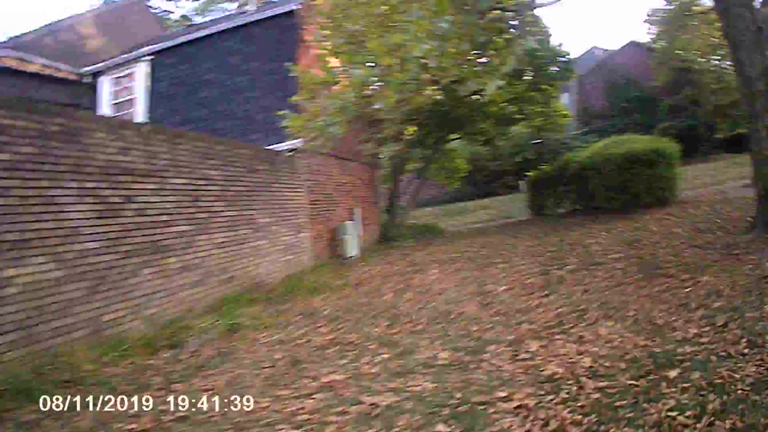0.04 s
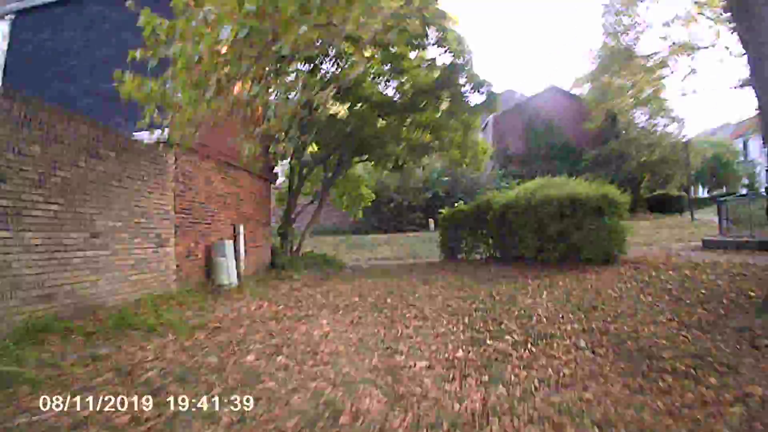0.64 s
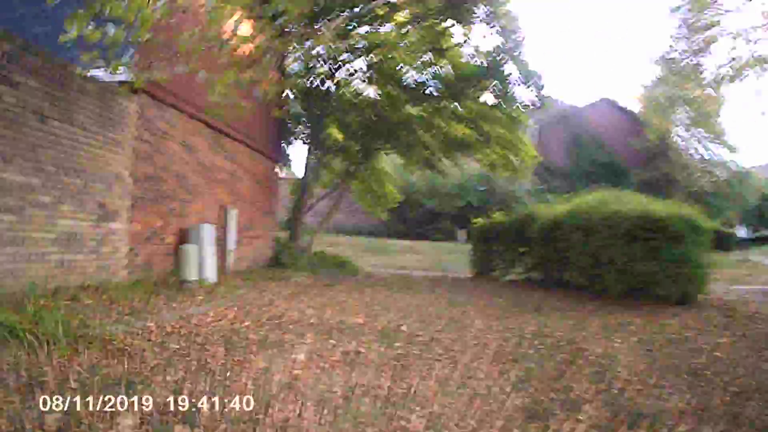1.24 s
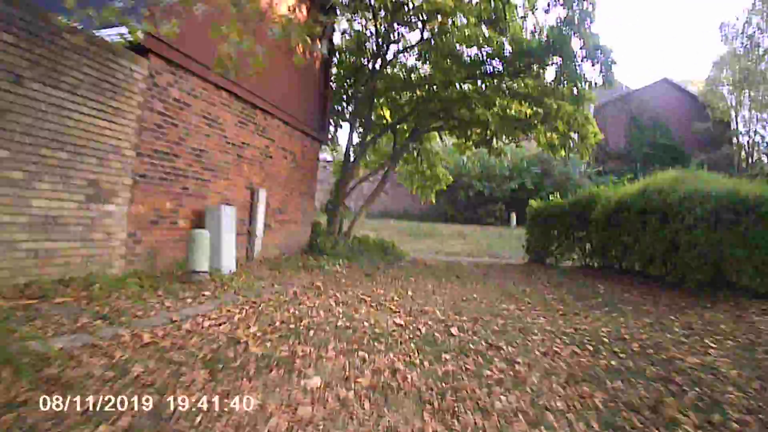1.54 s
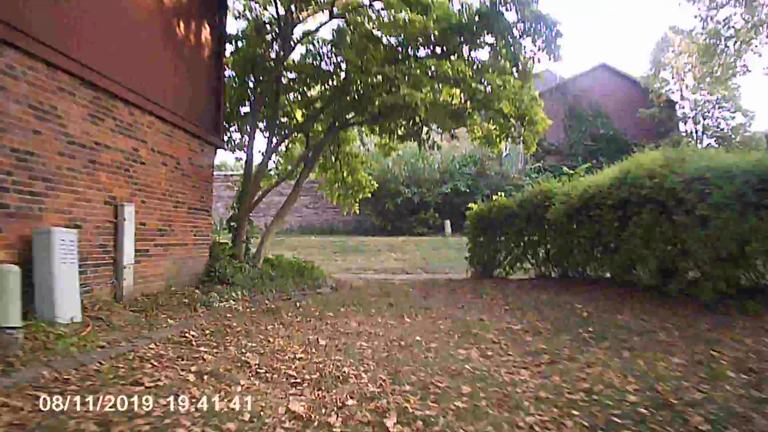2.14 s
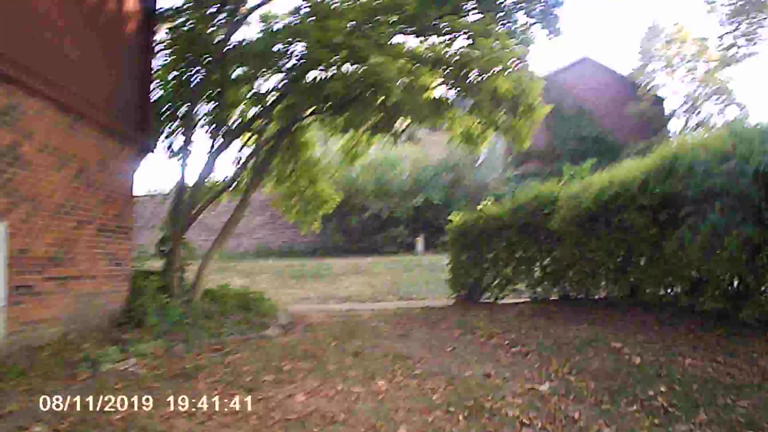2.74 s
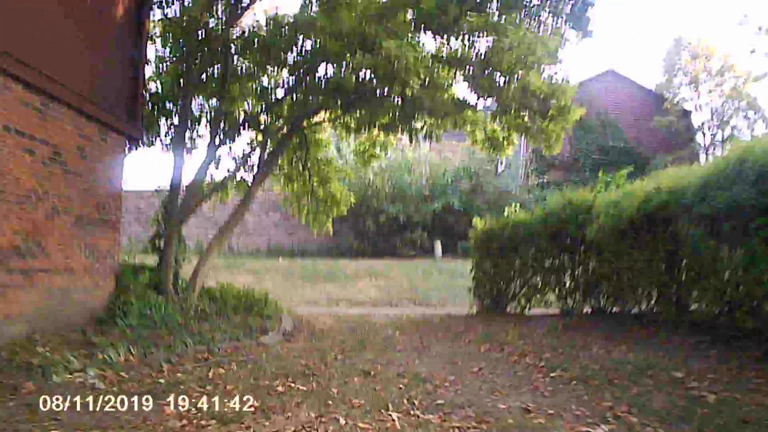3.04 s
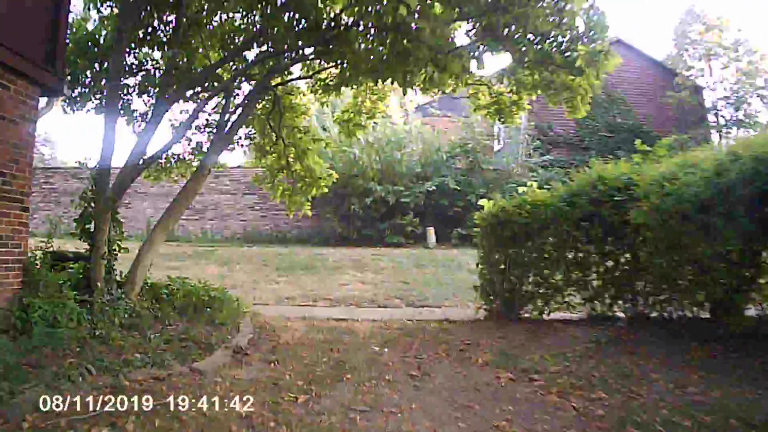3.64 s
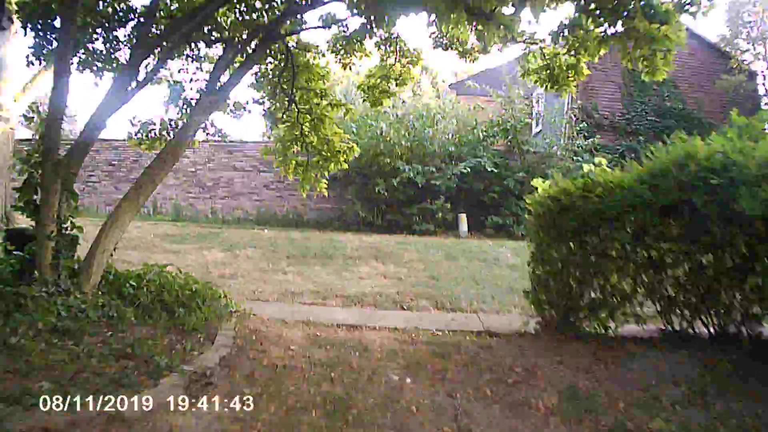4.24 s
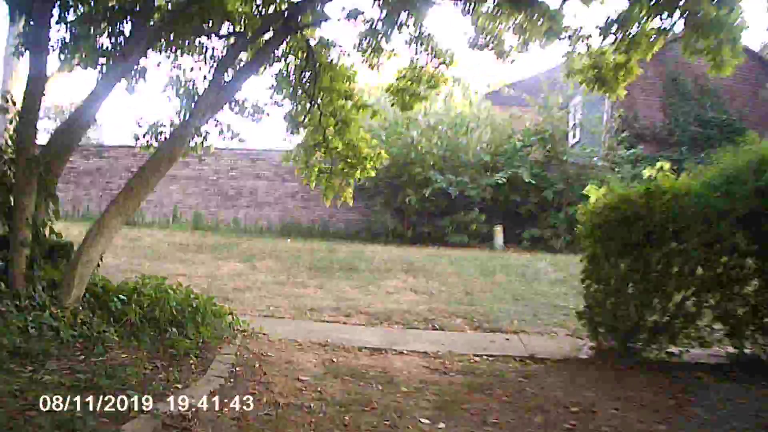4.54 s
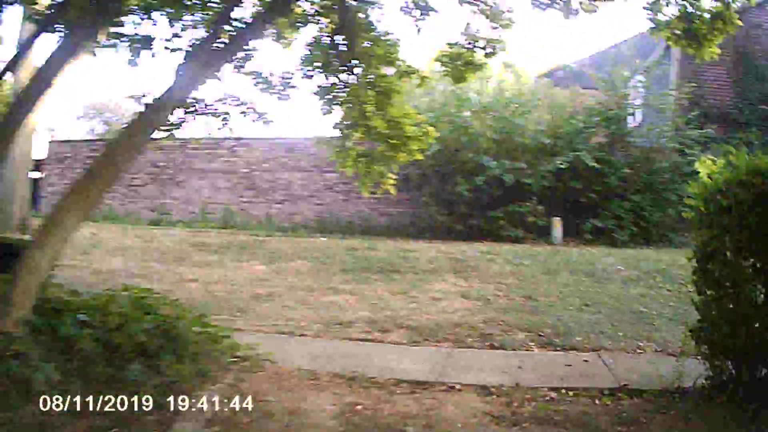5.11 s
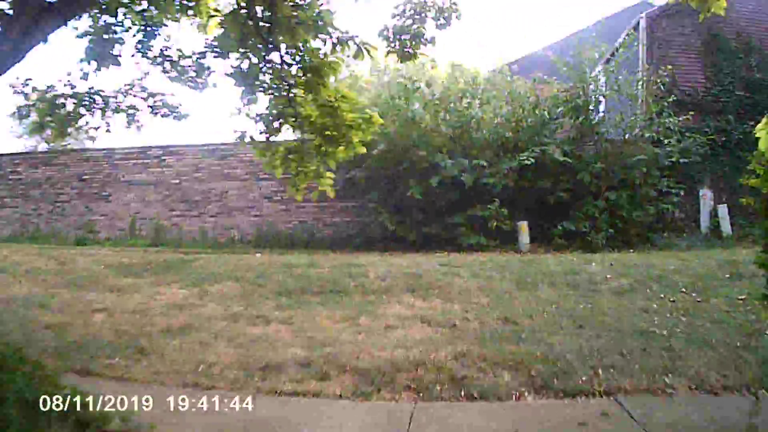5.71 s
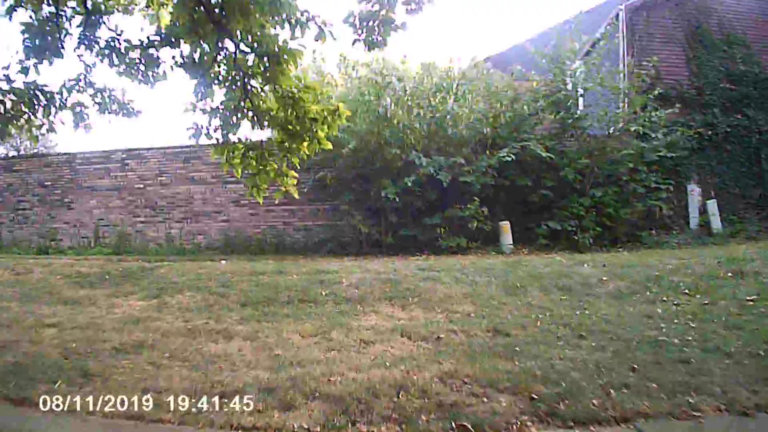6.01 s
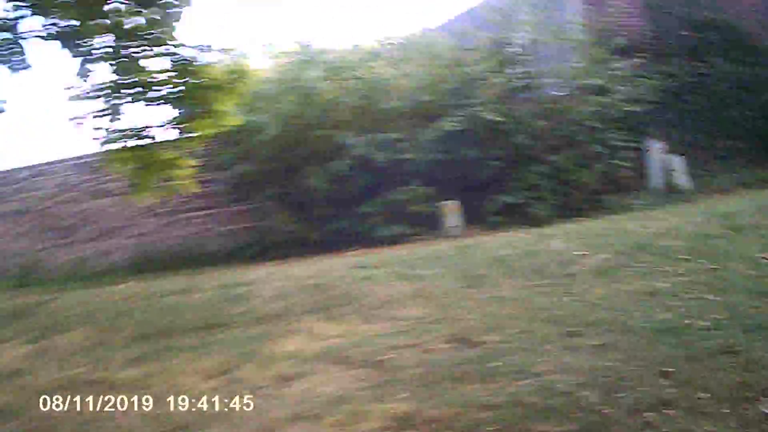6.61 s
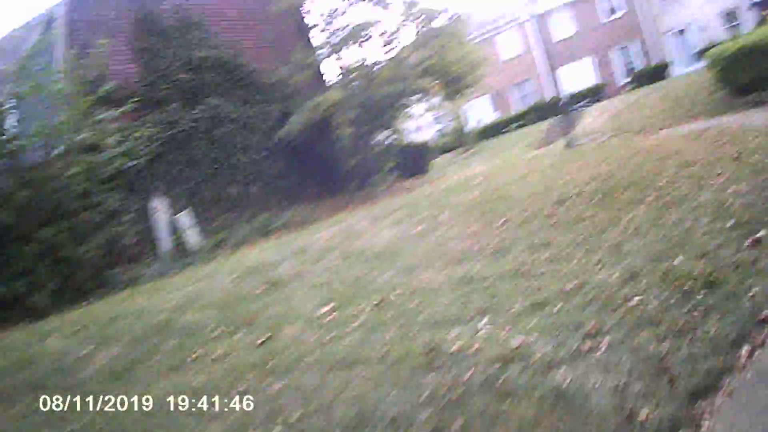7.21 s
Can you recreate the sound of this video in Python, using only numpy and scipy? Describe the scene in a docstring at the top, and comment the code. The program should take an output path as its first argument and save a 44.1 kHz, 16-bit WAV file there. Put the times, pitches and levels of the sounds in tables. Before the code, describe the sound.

Leaves crackle and snap under bicycle tyres, with low wind buffeting a microphone mounted on the bike. Early on, a cluster of bumps makes the bike clack loudly and the chain chink. Dry plastic rattling runs throughout, over a bassy shudder from the rough ground. The crunch fades across bare earth, and the ride ends more softly on a lawn with scattered snaps and clicks.

```python
"""A bicycle ride heard from a small camera fixed to the bike. It opens on dry leaves: wind rumbles
on the microphone, the tyres drum and crush leafy heaps, and each bump sways the camera on its
mount and rattles its case. Around one second in, the hardest bumps make the chain chink and the
bike knock. Then the bike slows, the wind eases and the crunch thins out over bare earth. It ends
on a lawn, with a duller swish and a few soft chinks, the case still ticking."""
import sys
import numpy as np
from scipy import signal
from scipy.fft import rfft, irfft, next_fast_len
from scipy.io import wavfile
from scipy.ndimage import uniform_filter1d

SR = 44100
rng = np.random.default_rng(int(sys.argv[2]) if len(sys.argv) > 2 else 0)


def transcribe(signal):
    """Save signal, clipped to [-1, 1], as a 16-bit WAV file at the path in sys.argv[1]."""
    frames = np.atleast_2d(signal).T
    limited = np.clip(frames, -1, 1)
    pcm = np.round(limited * 32767).astype(np.int16)
    wavfile.write(sys.argv[1], SR, pcm)


N = 324560
TIME = np.arange(N) / SR
CLICK_S, SCRAPE_S = .003, .006  # nominal length of a click; scrape leading into a hit

# Table levels are relative: each source adds its own trim.
# The ride, hardest on the leafy slope, easing as the bike slows.
# Each row: time in seconds, then wind, mount sway and tyre roll in dB.
RIDE_LEVELS = [(0.0, -36.5, -38, -57), (0.2, -35.5, -38, -53.5), (0.55, -38.5, -38.5, -53.5),
               (0.7, -34.0, -33.5, -48), (1.2, -33, -36.5, -49), (1.42, -25.5, -32.5, -45),
               (1.65, -37.5, -32, -48.5), (2.1, -35.5, -35, -51), (2.6, -35, -38.5, -51),
               (3.3, -37, -41, -54), (3.9, -41.5, -45, -56), (4.5, -40.5, -44, -59.0),
               (5.4, -40, -44.5, -55.5), (6.4, -42, -43, -61), (6.82, -36.0, -38, -57),
               (7.1, -46, -43.5, -58), (7.35, -61, -37, -58.5)]
# Buffeting dies down with speed. Each row: time in seconds, level in dB.
BUFFET_LEVELS = [(0, -56.5), (.4, -50.5), (.9, -52), (1.4, -47), (1.7, -57.5), (2.5, -60), (4, -67),
                 (6, -65), (7.35, -87)]
# Bumps and ruts. Each row: centre and length in seconds, sway boost in dB, roll and rattle boost in dB.
GROUND_BUMPS = [(0.237, 0.21, 3.5, 4.5), (0.617, 0.067, 0.5, -0.5), (1.148, 0.2, 7, 3.5),
                (1.764, 0.086, 4, 5.5), (2.175, 0.12, 4, 4.5), (2.569, 0.11, 7, 3), (3.146, 0.073, 7, 3.5),
                (3.338, .12, 5, 4), (3.619, 0.19, 11.5, 4.5), (4.1, 0.13, 5, 7), (4.208, 0.2, 2, 5),
                (4.456, 0.059, 2, 6), (4.664, 0.17, 3, 4), (4.9, 0.18, 3.5, 3), (5.04, 0.067, 4, 8.5),
                (5.13, 0.14, 6.5, 4.5), (5.44, .18, 3, 3), (5.57, .1, 4, 1.5), (5.71, 0.1, 7.5, 6),
                (5.866, .1, 5, 4), (6.04, 0.095, 5, 5), (6.222, 0.19, 6.5, 8.5), (6.396, 0.063, 4, 6.5),
                (6.484, 0.11, 5, 0.5), (6.64, 0.1, 2, 6.5), (6.737, .1, -2, 9.5), (6.907, 0.23, 2, 8),
                (7.125, 0.095, 5, 7), (7.21, 0.11, 3, 4.5), (7.338, 0.091, 3, 7)]
# Leaves lie thick, thin out on earth and are few on the lawn. Each row: time in seconds, crunch in dB.
CRUNCH_BED = [(0, -60.5), (.3, -55), (.7, -62.5), (.84, -66.5), (1.1, -56.5), (1.27, -62), (1.5, -58),
              (1.65, -56.5), (1.95, -54), (2.2, -59.5), (2.5, -54), (2.95, -64.5), (3.3, -57.5),
              (3.95, -64.5), (4.2, -57), (4.9, -79.5), (6, -77), (6.7, -85), (7.3, -91)]
# A heap or grass tuft is crushed. Each row: peak time in seconds, level in dB, decay in dB per second.
CRUSHED_HEAPS = [(.325, -59, 300), (.473, -57, 252), (.546, -54, 90), (.674, -50, 186), (.886, -53, 350),
                 (1.074, -47, 109), (1.354, -51.5, 150), (1.46, -46, 148), (1.886, -50.5, 110),
                 (2.41, -51.5, 90), (2.67, -52, 85), (2.833, -50.5, 330), (3.023, -49.5, 80),
                 (3.24, -47, 137), (3.394, -55.5, 218), (3.554, -56, 96), (3.719, -52.5, 224),
                 (3.816, -52, 250), (4.086, -51.5, 323), (4.168, -50.5, 119), (4.326, -55, 353),
                 (4.423, -57.5, 220), (4.588, -57.5, 88), (4.676, -58, 142), (4.891, -68, 220),
                 (5.102, -61, 124), (5.213, -68, 95), (5.314, -65.5, 72), (5.383, -64.5, 68),
                 (5.611, -63.5, 350), (5.726, -63.5, 115), (5.872, -67.5, 240), (6.03, -63, 200),
                 (6.194, -58, 210), (6.371, -59, 280), (6.436, -60, 283), (6.526, -64.5, 330),
                 (6.83, -52.5, 280), (6.94, -61.5, 270), (7.355, -56, 150)]
# Dry leaves sparkle, the lawn is duller. Each row: time in seconds, top treble gain in dB.
LEAF_SPARKLE = [(0, 1.5), (4.6, 2), (5.2, 4.5), (6.3, 5.5), (6.8, -1), (7.35, -4)]
# Leaves and stalks that snap loudly. Each row: start in seconds, level in dB.
LOUD_SNAPS = [(0.2615, -42), (0.664, -41), (1.0837, -39), (1.1891, -41.5), (2.3098, -49), (2.4038, -43.5),
              (2.6596, -47), (2.8374, -55), (3.148, -42.5), (3.7929, -44.5), (3.8222, -41.5),
              (4.0856, -47.5), (4.18, -42), (4.672, -48), (5.605, -50), (5.7173, -51), (5.9891, -48.5),
              (6.0191, -54), (6.0371, -50), (6.8327, -47)]
# Loudest ticks of the loose case. Each row: start in seconds, level in dB, tilt in dB per octave.
CASE_TICKS = [(0.177, -43.5, 4), (0.2292, -43, 2), (.3533, -40, 0), (0.425, -40.5, -5), (.602, -40.5, 2),
              (.624, -42, 4), (.647, -46, 4), (0.7202, -38, 1), (0.9825, -39.5, 4), (1.098, -36, 2),
              (1.418, -37, 0), (1.4934, -35, 1), (1.5385, -37.5, 3), (1.601, -40, 3), (1.6596, -38, 2),
              (1.731, -40.5, 1), (1.7581, -42.5, 4), (1.767, -38, 3.5), (1.914, -40.5, 2.5),
              (2.0582, -39.5, -1), (2.1122, -39, 3), (2.1587, -39.5, 2), (2.2225, -38, 2),
              (2.3511, -41.5, -2), (2.5583, -38, -0.5), (2.832, -43, -1.5), (2.9112, -39.5, 0.5),
              (3.0331, -36.5, 1), (3.055, -40.5, 3.5), (3.5808, -39, -2), (3.6117, -40, 2.5),
              (3.8216, -40, 5.5), (3.9817, -41.5, -4.5), (3.996, -44.5, 1), (4.1048, -42.5, 4),
              (4.1564, -39.5, 5), (4.4456, -42.5, -2), (4.6719, -44, -1), (4.687, -40.5, -2.5),
              (4.8651, -44.5, -3.5), (4.8832, -45.5, 2.5), (4.922, -42.5, -4.5), (5.041, -42, -1.5),
              (5.1129, -43, -6.5), (5.1789, -43, -4.5), (5.3881, -41, 0.5), (5.4412, -43, 0.5),
              (5.473, -42.5, -4.5), (5.5418, -45, -2), (5.5907, -44, -2.5), (5.7173, -41.5, -3),
              (5.7508, -43, -6), (5.856, -44.5, -3), (5.889, -41, -1.5), (6.056, -43, 1), (6.1044, -48, -4),
              (6.1852, -40, -2.5), (6.1988, -42.5, 0.5), (6.2406, -43, -1.5), (6.259, -45, -2.5),
              (6.2901, -51, -4), (6.3693, -40.5, -6.5), (6.4607, -43.5, -2.5), (6.474, -45.5, -2),
              (6.518, -43.5, -5.5), (6.5588, -42.5, -6), (6.5848, -42.5, -3.5), (6.6222, -46, -1.5),
              (6.6376, -40.5, 0.5), (6.6598, -45, -4), (6.721, -43, -3.5), (6.727, -44, -1.5),
              (6.7681, -40.5, -3.5), (6.8908, -41, -3), (6.943, -41.5, 1), (6.9854, -42, -1),
              (7.108, -44.5, -2), (7.137, -45.5, -5.5), (7.208, -44.5, -1.5), (7.2465, -46, -1),
              (7.321, -42, -3.5)]
# Chain slaps. Each row: start in seconds, level in dB, tilt in dB per octave.
CHAIN_SLAPS = [(0.39, -45, 1), (.9968, -36, -2), (1.008, -41, -3), (1.016, -51, 14), (1.0225, -51, 10),
               (1.065, -42, -6.5), (1.1114, -41, -6), (1.1538, -46, -5), (1.278, -43, 1), (1.4741, -40, 3),
               (1.6822, -43, 1), (2.9234, -40, -5.5), (2.9351, -45, -3), (6.8581, -44, -10),
               (7.0018, -50, -16), (7.009, -53, -19)]
# The ring of the links. Each row: frequency in Hz, level in dB, seconds to decay by 60 dB.
LINK_MODES = [(2580, -8, .022), (2816, 9.5, 0.012), (3050, 0, 0.012), (3750, 1.5, 0.013),
              (8200, -22, 0.025), (8560, -12, .02)]
# Hard knocks over bumps. Each row: start in seconds, level in dB, tilt in dB per octave,
# lead-in scuff in dB relative to the hit.
FRAME_KNOCKS = [(0.685, -34, 1.5, 0), (0.958, -22.5, -1, -13), (1.0096, -33.5, -2.5, -9),
                (1.184, -32.5, 5.5, -24), (1.2468, -28, 1.5, -9), (1.3576, -25, -1, -4),
                (1.3811, -22, 1.2, -8), (1.4017, -29, -3.5, -16), (1.4489, -18.5, -0.5, -26),
                (1.4594, -29, -2.5, -8), (1.463, -39, -5.5, -4)]

# The EQ curve of each layer. Each row: frequency in Hz, gain in dB.
RUMBLE_EQ = [(5, -1.5), (15, 4.5), (28, 5), (45, 2.5), (60, -10), (100, -43), (200, -56), (600, -60)]  # sub-bass wind
BUFFET_EQ = [(60, -25), (110, -2.5), (190, -2), (260, -7), (400, -15), (1000, -23), (3000, -55)]  # low flutter of the airstream
AMBIENCE_EQ = [(200, 13), (1300, 12.5), (3000, -22), (6500, -2), (8000, -4), (12700, -4), (16000, -21)]  # outdoor hiss
ROLL_EQ = [(70, -6.5), (120, -17), (170, -5), (230, -4), (285, 7), (400, -4), (700, 0), (950, -9),
           (1250, 4.5), (1550, 1.5), (1900, -12.5), (3000, -20.5), (6000, -30)]  # tread heard through the frame
SWAY_EQ = [(20, -18), (45, -7), (64, 0), (73, -3), (85, -11), (110, -20), (170, -33), (600, -80)]  # bass resonance of the mount
CASE_EQ = [(150, -18), (430, -11), (700, -4), (980, 0.5), (1450, 0), (2200, -6), (2750, -5.5), (3250, -22),
           (3600, -13), (4000, -4), (4500, -16.5), (6300, -24.5), (8000, -29.5), (16000, -44)]  # boxy plastic
LEAF_EQ = [(300, -21), (900, -5), (1400, 2.5), (2200, -4), (3000, -9), (3900, 0), (4900, -8), (5600, -2),
           (6600, -2.5), (7900, -19.5), (9200, -11.5), (10700, -20.5), (12700, -8.5), (16000, -34)]  # crisp leaf fracture
KNOCK_EQ = [(150, -15.5), (420, -15), (680, -6.5), (940, -20), (1220, 1), (1550, -1), (1900, -14),
            (3100, -10), (4800, -17), (6400, -21), (7400, -29), (9000, -22), (11500, -29), (16000, -42.5)]  # midrange clack of the frame


def undb(db):
    """Decibels to gain."""
    return 10 ** (np.asarray(db) / 20)


def automation(rows, column=1):
    """One column of a table, joined by straight ramps in time."""
    rows = np.array(rows)
    return np.interp(TIME, rows[:, 0], rows[:, column])


def unit_rms(x):
    """Scale to rms 1."""
    return x / np.sqrt(np.mean(x ** 2))


def wobble(rate):
    """Smooth random modulation, rms 1, changing about rate times a second."""
    hold = max(int(SR / rate), 2)
    steps = np.repeat(rng.standard_normal(N // hold + 1), hold)
    return unit_rms(uniform_filter1d(steps, hold)[:N])


def eq_db(eq, hz):
    """Read an EQ curve on a log-frequency axis."""
    points = np.array(eq)
    return np.interp(np.log(hz + 1e-3), np.log(points[:, 0]), points[:, 1])


def noise(eq):
    """Steady noise shaped by an EQ curve, rms 1."""
    size = next_fast_len(N)
    hz = np.fft.rfftfreq(size, 1 / SR)
    spectrum = rfft(rng.standard_normal(size)) * undb(eq_db(eq, hz))
    return unit_rms(irfft(spectrum, size)[:N])


def body(eq, tilt_db=0, ripple_db=0, size=1024):
    """Ring of a body after one tap, energy 1; each contact point has its own tilt and ripple."""
    hz = np.fft.rfftfreq(size, 1 / SR)
    octave = np.log2(np.clip(hz, 400, 8000) / 1500)
    ripple = np.interp(np.sqrt(hz), np.linspace(0, np.sqrt(SR / 2), 48), rng.standard_normal(48))
    gain = undb(eq_db(eq, hz) + tilt_db * octave + ripple_db * ripple)
    # minimum phase: the ring follows the tap
    cepstrum = irfft(np.log(gain))
    cepstrum[1:size // 2] *= 2
    cepstrum[size // 2 + 1:] = 0
    # low bending waves travel slower and smear the tap: 0.6 ms of delay at 1 kHz
    lag = 4 * np.pi * .0006 * np.sqrt(1000 * hz)
    ring = irfft(np.exp(rfft(cepstrum) - 1j * lag))
    return ring / np.linalg.norm(ring)


def noise_tail(t60, size=4096):
    """Decaying noise, energy 1."""
    tail = rng.standard_normal(size) * np.exp(-np.log(1000) * np.arange(size) / SR / t60)
    return tail / np.linalg.norm(tail)


def through(drive, ring):
    """Play a drive through a resonant body."""
    return signal.oaconvolve(drive, ring)[:len(drive)]


def place(out, s, db, sound):
    """Mix in a hit at s seconds; with energy 1, db is its rms taken over one click length."""
    start = max(int(s * SR), 0)
    part = sound[:max(N - start, 0)]
    out[start:start + len(part)] += undb(db) * np.sqrt(CLICK_S * SR) * part


def grains(rate, spread_db, cap):
    """Tiny random impacts, many weak, a few strong; the power holds even as the rate changes."""
    at = np.flatnonzero(rng.random(N) < rate / SR)
    strength = undb(spread_db * np.minimum(rng.exponential(size=N)[at], cap))
    out = np.zeros(N)
    out[at] = strength * np.sign(rng.random(N)[at] - .5)
    return unit_rms(out / np.sqrt(rate))


def bounces(gap_s, loss_db, count=4, size=1024):
    """A tap and its ever weaker rebounds at uneven gaps, energy 1."""
    contact = np.zeros(size)
    gaps = gap_s * rng.uniform(.5, 2, count)
    at = np.minimum(np.cumsum(gaps) * SR, size - 1).astype(int)
    contact[at] = undb(loss_db * np.arange(1, count + 1)) * np.sign(rng.standard_normal(count))
    contact[0] = 1
    return contact / np.linalg.norm(contact)


def scrape_into(contact, db, t60):
    """Surfaces scrape with growing force for SCRAPE_S before they meet fully."""
    swell = noise_tail(t60, size=int(SCRAPE_S * SR))[::-1]
    return np.concatenate([undb(db) * swell, contact])


def bump_db(column):
    """Extra shake that swells and sinks over each bump."""
    db = np.zeros(N)
    for bump in GROUND_BUMPS:
        centre, length = bump[:2]
        over = slice(*np.searchsorted(TIME, [centre - length / 2, centre + length / 2]))
        db[over] += bump[column] * np.cos(np.pi * (TIME[over] - centre) / length)
    return db


def roll_db():
    """Level envelope of the tyre roll in the frame, lifted by bumps."""
    return automation(RIDE_LEVELS, column=3) + bump_db(column=3)


def wind(trim_db=-1, hiss_db=-68.5, flutter_db=2):
    """Wind rumbles on the microphone and buffets it at speed, over a faint outdoor hiss."""
    rumble = noise(RUMBLE_EQ) * undb(automation(RIDE_LEVELS) + trim_db)
    buffeting = noise(BUFFET_EQ) * undb(automation(BUFFET_LEVELS) + flutter_db * wobble(20))
    return rumble + buffeting + noise(AMBIENCE_EQ) * undb(hiss_db)


def tyre_roll(trim_db=-2, lumpy_db=4):
    """The tread drums on rough ground and the frame carries it to the camera."""
    drumming = grains(rate=1500, spread_db=2.5, cap=7.2) * undb(lumpy_db * wobble(60))
    roll = through(drumming, body(ROLL_EQ, size=4096))
    return unit_rms(roll) * undb(roll_db() + trim_db)


def camera_mount(trim_db=-1, chatter_db=-7, scatter_db=9):
    """The camera sways on its springy mount; loose parts tap and rebound at each turning point."""
    sway = noise(SWAY_EQ)
    direction = np.sign(np.gradient(uniform_filter1d(sway, size=64)))
    chatter = np.zeros(N)
    for turn in np.flatnonzero(np.diff(direction, prepend=0)):
        tap = through(bounces(gap_s=.0015, loss_db=-6), body(CASE_EQ, tilt_db=-3.5, ripple_db=3))
        tap_db = scatter_db * np.clip(rng.standard_normal(), -2, 1)
        place(chatter, turn / SR, tap_db, sway[turn] * tap)
    sway_db = automation(RIDE_LEVELS, column=2) + bump_db(column=2) + trim_db
    return sway * undb(sway_db) + unit_rms(chatter) * undb(roll_db() + chatter_db)


def crunch_envelope(attack_s=.016, patchy_db=1):
    """Crunch level in dB: a patchy bed of leaves, plus heaps that give way fast and die off."""
    power = undb(automation(CRUNCH_BED) + patchy_db * wobble(18)) ** 2
    for s, db, decay in CRUSHED_HEAPS:
        during = slice(*np.searchsorted(TIME, [s - 2 * attack_s, s + .5]))
        age = TIME[during] - s
        attack = np.exp(-(np.minimum(age, 0) / attack_s) ** 2)
        power[during] += (undb(db - decay * np.maximum(age, 0)) * attack) ** 2
    return 10 * np.log10(power)


def small_snaps(crunch_db, above_db=6, spread_db=4.5, count=26):
    """Lesser snaps at random moments, riding the crunch level; rows as in LOUD_SNAPS."""
    at = rng.integers(N, size=count)
    return list(zip(at / SR, crunch_db[at] + above_db + spread_db * rng.standard_normal(count)))


def leaves(trim_db=2, clump_db=4, thinning=.5, sparkle_hz=9000, layers=12):
    """Leaves break in clumps of fractures, sparser where few lie; some snap loudly."""
    crunch_db = crunch_envelope()
    rate = 380 * undb(thinning * (crunch_db - np.median(crunch_db)))
    crunch = np.zeros(N)
    for _ in range(layers):  # each layer has its own tone
        fractures = grains(rate, spread_db=3, cap=4.2) * undb(clump_db * np.minimum(wobble(170), 2))
        crunch += through(fractures, body(LEAF_EQ, ripple_db=4))
    out = unit_rms(crunch * undb(2.4 * wobble(70))) * undb(crunch_db + trim_db)
    for s, db in LOUD_SNAPS + small_snaps(crunch_db):
        tear = scrape_into(bounces(gap_s=.00044, loss_db=-5), db=-10.5, t60=.0055)
        place(out, s - SCRAPE_S, db, through(tear, body(LEAF_EQ, ripple_db=2)))
    top = signal.sosfiltfilt(signal.butter(2, sparkle_hz, "high", fs=SR, output="sos"), out)
    return out + top * (undb(automation(LEAF_SPARKLE)) - 1)


def small_ticks(gap_s=.024, above_db=7, spread_db=2, clear_s=.018, count=480):
    """Filler ticks, denser and stronger on bumps, brighter on rough ground; rows as in CASE_TICKS."""
    times = np.cumsum(gap_s * rng.gamma(2, .5, count))
    strength, tilt_scatter = rng.standard_normal((count, 2)).T
    db = np.interp(times, TIME, roll_db()) + above_db + spread_db * np.minimum(strength, 1)
    ground_db = automation(RIDE_LEVELS, column=3)
    roughness_db = np.interp(times, TIME, ground_db - ground_db.mean())
    tilt_db = -1.5 + .49 * roughness_db + tilt_scatter
    chance = .4 + .25 * np.interp(times, TIME, bump_db(column=3))
    thrown = rng.random(count) < chance
    clear_of_loud = np.abs(times[:, None] - np.array(CASE_TICKS)[:, 0]).min(axis=1) > clear_s
    return list(np.column_stack([times, db, tilt_db])[thrown & clear_of_loud & (times < TIME[-1])])


def case_rattle(ring_db=-19, ring_t60=.095, rebound_s=.0077, rebound_db=-7):
    """Jolts throw the plastic case against its stops in dry ticks; after a loud one it falls back."""
    out = np.zeros(N)
    rebounds = [(s + rebound_s * rng.uniform(.7, 1.4), db + rebound_db, tilt_db)
                for s, db, tilt_db in CASE_TICKS]
    for s, db, tilt_db in CASE_TICKS + rebounds + small_ticks():
        contact = bounces(gap_s=.0009, loss_db=-6.5) + undb(ring_db) * noise_tail(ring_t60, size=1024)
        contact = scrape_into(contact, db=-14, t60=.011)
        place(out, s - SCRAPE_S, db, through(contact, body(CASE_EQ, tilt_db, ripple_db=2.5)))
    return out


def chain_chinks(trim_db=2, detune=.024, uneven_db=3, attack_s=.00087):
    """Links roll onto steel and ring briefly, each slap with its own tuning and balance."""
    out, t = np.zeros(N), np.arange(4096) / SR
    hz, mode_db, t60 = np.array(LINK_MODES).T[:, :, None]
    attack = 1 - np.exp(-(t / attack_s) ** 2)
    decay = np.exp(-np.log(1000) * t / t60)
    for s, db, tilt_db in CHAIN_SLAPS:
        pitch, weight = rng.standard_normal((2, len(hz), 1))
        strength = undb(mode_db + uneven_db * weight + tilt_db * np.log2(hz / hz[0]))
        modes = strength * np.sin(2 * np.pi * hz * (1 + detune * pitch) * t)
        ring = (modes * decay).sum(axis=0) * attack
        place(out, s, db + trim_db, ring / np.linalg.norm(ring))
    return out


def frame_knocks(trim_db=-1, buzz_db=-11, ring_db=-15, thud_db=1):
    """A scuff, a hard hit and a brief buzz as parts settle; the frame rings and the mount thuds."""
    out = np.zeros(N)
    for s, db, tilt_db, scuff_db in FRAME_KNOCKS:
        hit = bounces(gap_s=.0006, loss_db=-7.5, size=4096)
        buzz = undb(buzz_db) * noise_tail(t60=.021)
        ring = undb(ring_db) * noise_tail(t60=.1114)
        contact = scrape_into(hit + buzz + ring, scuff_db, t60=.032)
        place(out, s - SCRAPE_S, db + trim_db, through(contact, body(KNOCK_EQ, tilt_db, ripple_db=1.5)))
        place(out, s, db + thud_db, -body(SWAY_EQ, size=8192))
    return out


def scene():
    """Mono mix of all layers at the camera's microphone."""
    bed = wind() + tyre_roll() + camera_mount() + leaves()
    return (bed + case_rattle() + chain_chinks() + frame_knocks())[None]


def record(dry):
    """The camera cuts the top of the treble with a steep low-pass."""
    cutoff_hz = 15900
    return signal.sosfilt(signal.ellip(8, .2, 70, cutoff_hz, fs=SR, output="sos"), dry)


dry = scene()
out = record(dry)
transcribe(out)
```